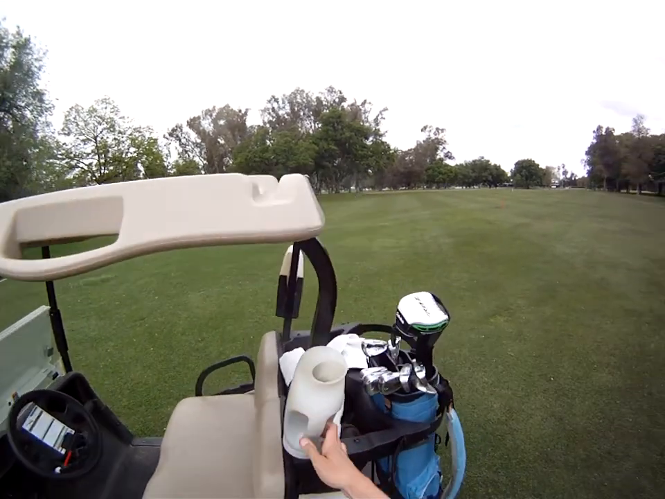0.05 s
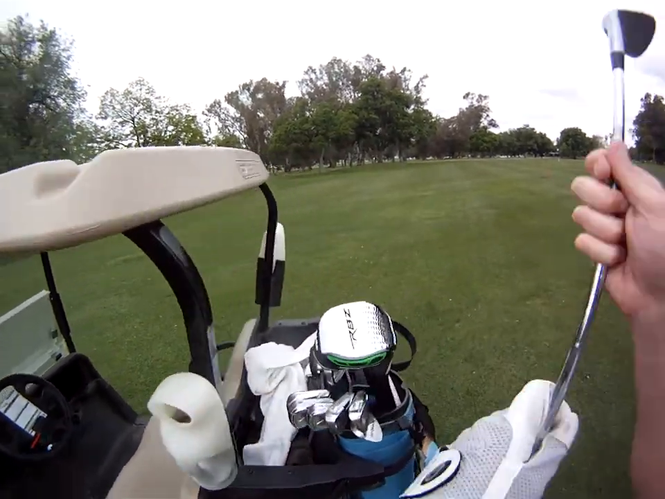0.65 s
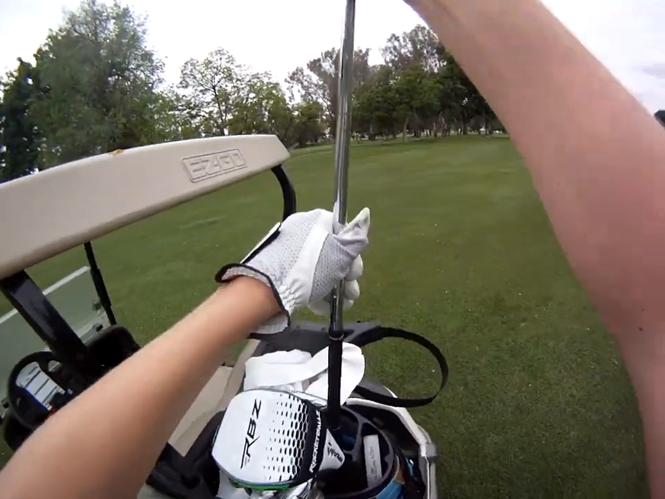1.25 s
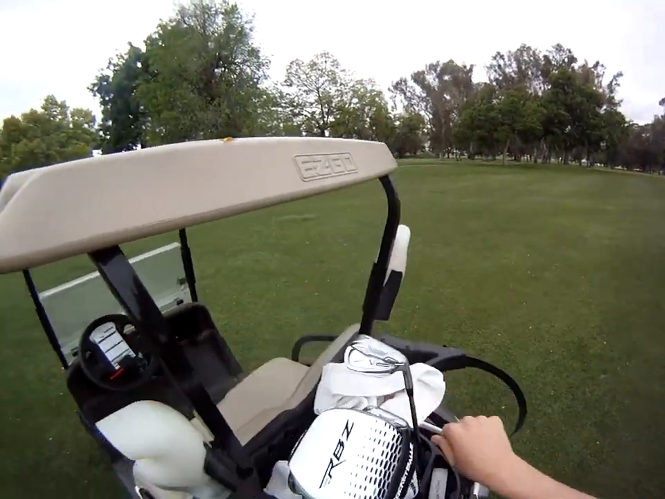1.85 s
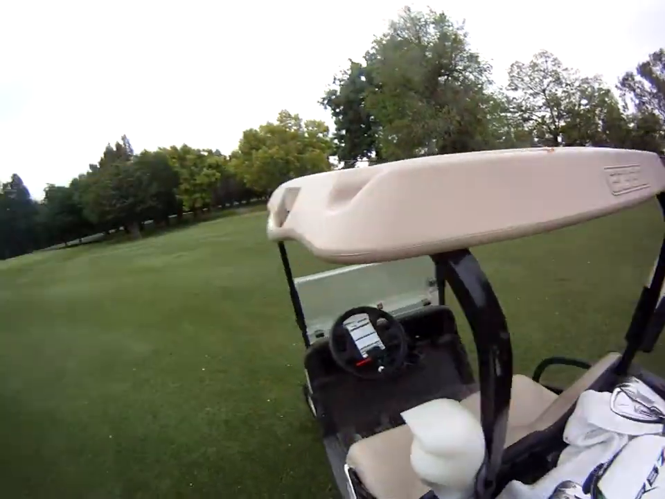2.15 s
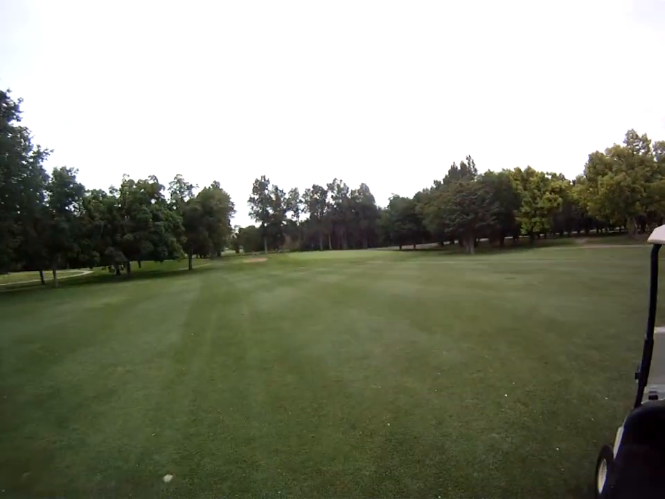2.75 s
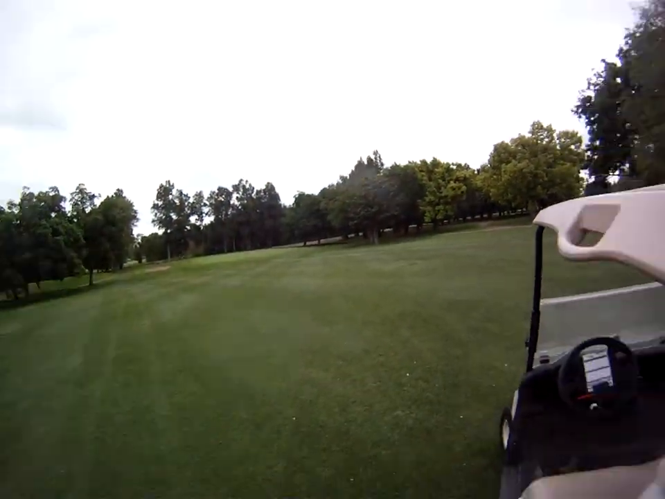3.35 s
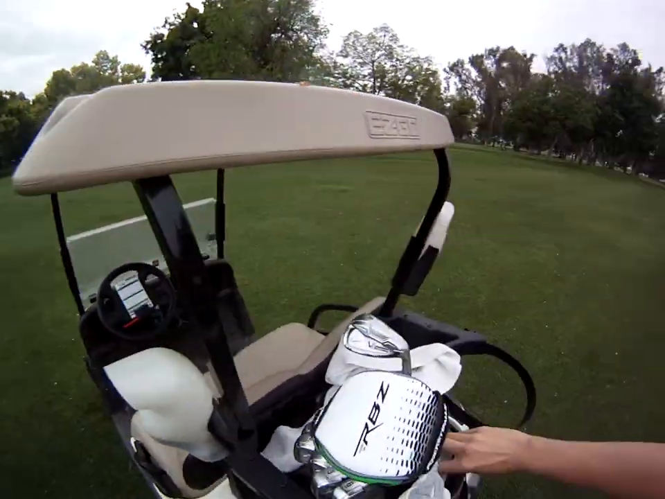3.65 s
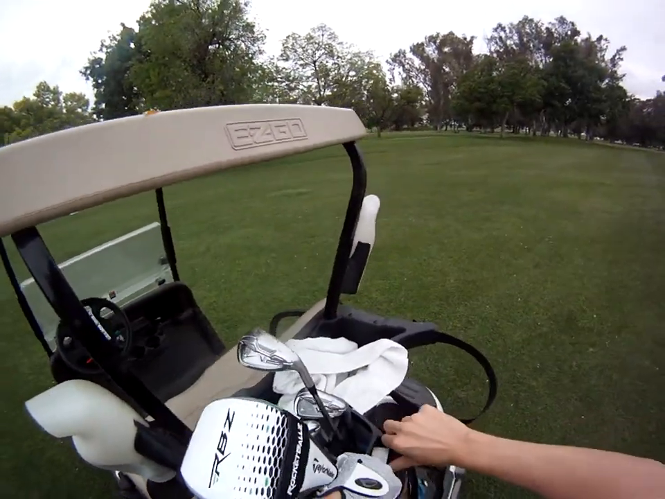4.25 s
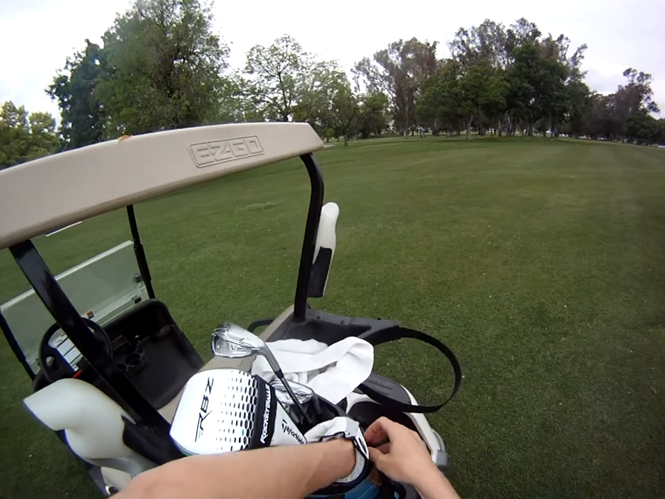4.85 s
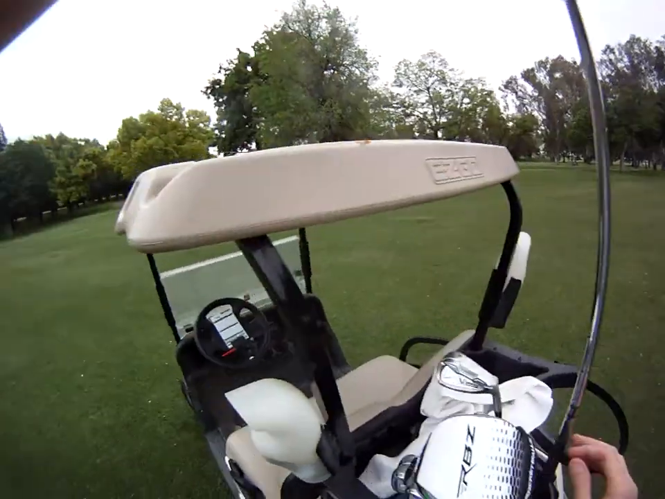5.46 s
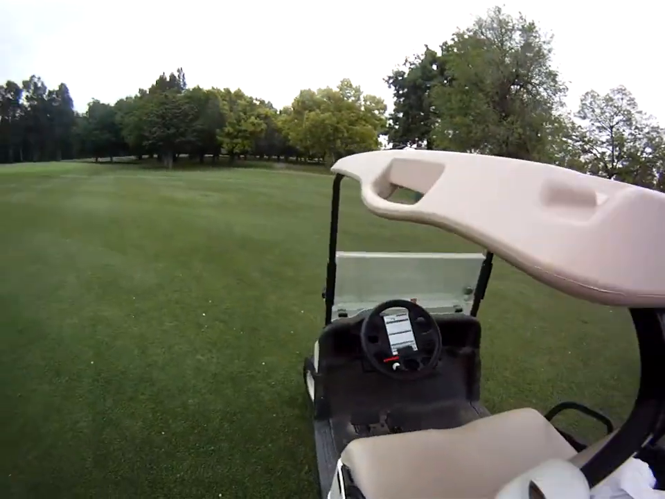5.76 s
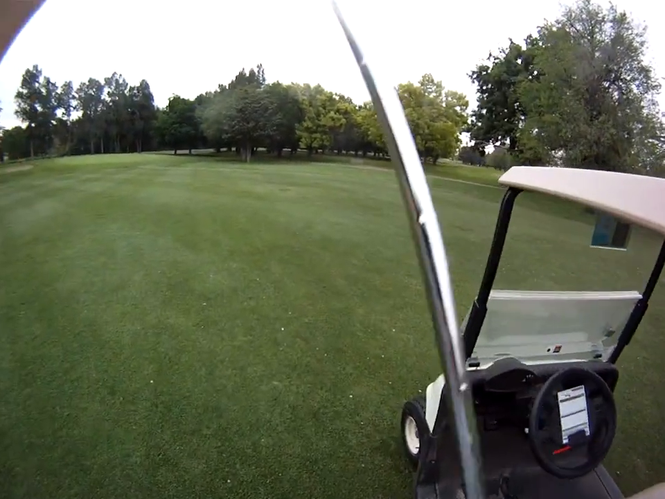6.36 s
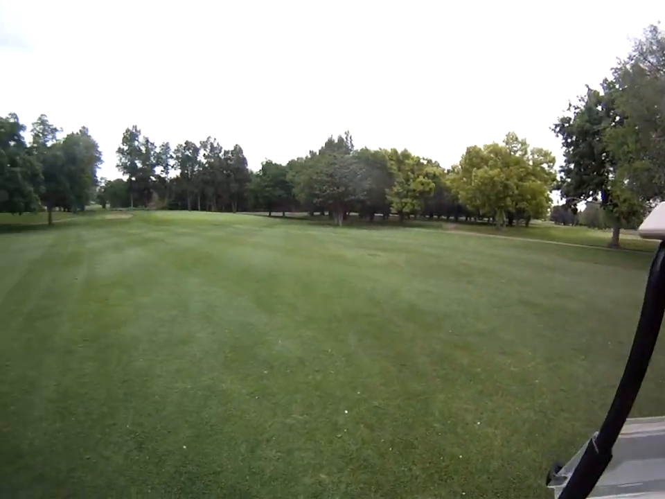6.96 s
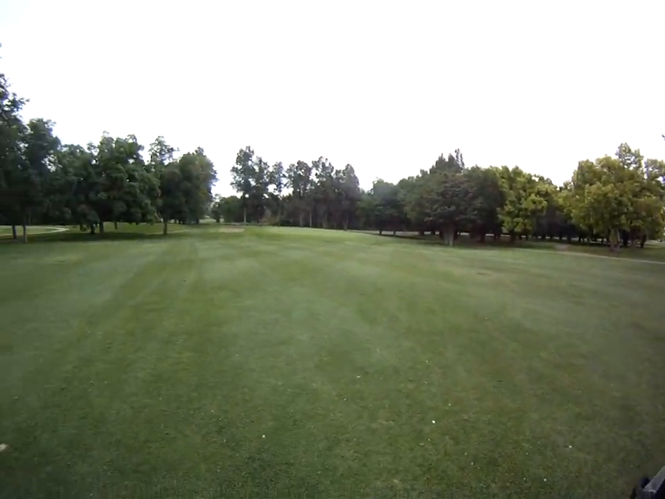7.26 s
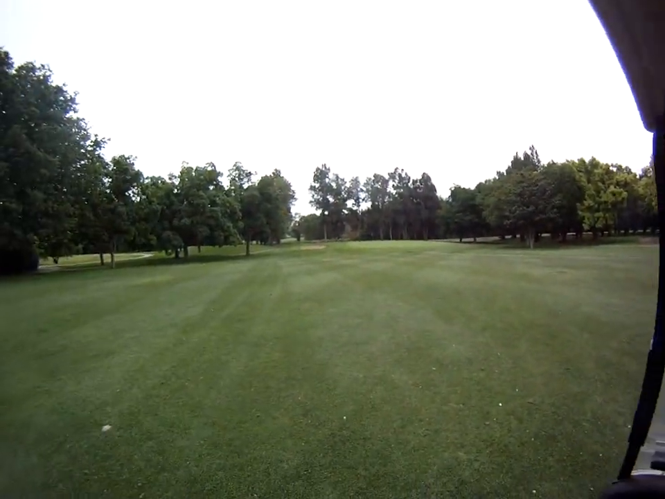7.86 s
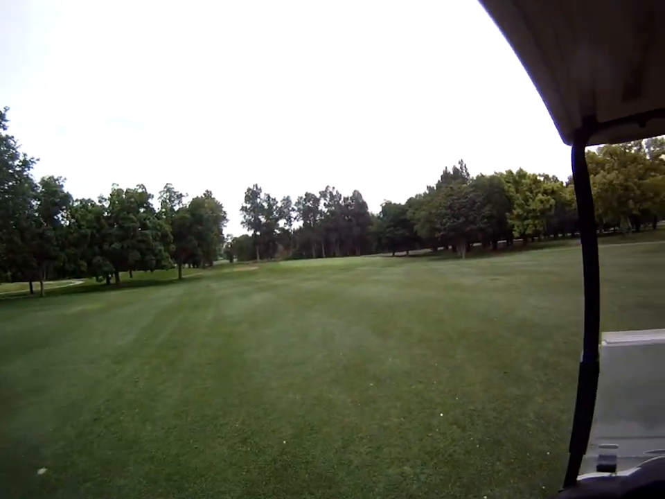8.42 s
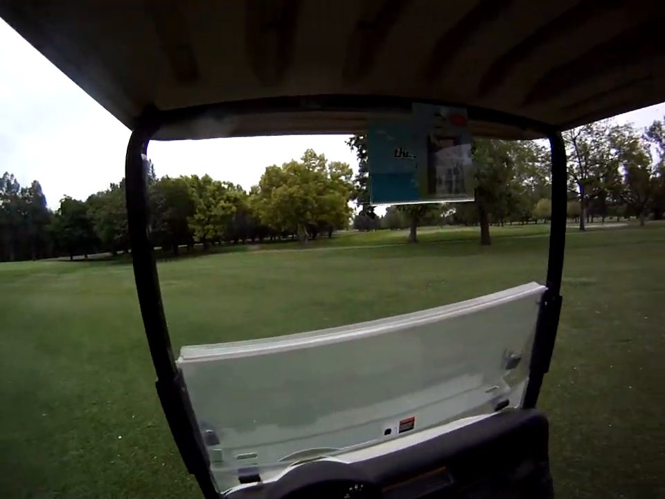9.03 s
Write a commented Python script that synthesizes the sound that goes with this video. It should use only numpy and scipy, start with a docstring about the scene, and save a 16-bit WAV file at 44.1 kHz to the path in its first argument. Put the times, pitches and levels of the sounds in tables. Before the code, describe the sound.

A golf club slides into a bag with hollow knocks and short squeaks, and steel heads clack together. More clattering and scraping follow in bursts as the clubs are rummaged through and one is drawn out. After a lull, someone climbs into a golf cart with low thumps and rattling knocks, ending in a faint hum. Everything is close to the microphone, with light wind and quiet open air behind.

```python
"""Golf fairway, at a cart: a golfer slides an iron into the bag, rummages, draws a club and climbs aboard.
Steel heads clack and ring; shafts knock in the hollow bag, scrape and squeak by stick-slip.
The cart thumps under the golfer's weight, then hums faintly. Behind: light wind and a far bird.
A small head-mounted camera holds each sample at a low rate, mirroring the sound into the treble."""
import sys
import numpy as np
from scipy import signal
from scipy.fft import rfft, irfft, next_fast_len
from scipy.io import wavfile
from scipy.ndimage import uniform_filter1d, map_coordinates

SR = 44100
rng = np.random.default_rng(int(sys.argv[2]) if len(sys.argv) > 2 else 0)


def dump_mix(stems):
    """Bounce the given channels to the path in sys.argv[1] as a 16-bit WAV at rate SR."""
    frames = np.atleast_2d(stems).T  # one column per channel
    limited = np.clip(frames, -1, 1)  # hard clip at full scale
    pcm = np.round(limited * 32767).astype(np.int16)
    wavfile.write(sys.argv[1], SR, pcm)


N = 400869
TIME_S = np.arange(N) / SR
AGE_S = np.arange(SR // 4) / SR  # time since a blow

# Clubs striking the bag. Each row: start in seconds, relative level in dB, hardness (0 grip, 1 shaft).
BAG_KNOCKS = [(0.147, -40, 0.51), (1.473, -36, 0.1), (1.524, -27, 0.017), (1.599, -26, 0.068),
              (1.808, -31.5, 0.033), (1.862, -26, 0.47), (1.911, -25, 0.85), (2.034, -24, 0.66),
              (2.085, -31.5, 0.56), (2.131, -36, 0.81), (2.757, -40.5, 0.83), (2.845, -33, 0.067),
              (3.163, -41, 0.97), (3.52, -33.5, 0.77), (3.58, -25.5, 0.96), (3.607, -25, 0.82),
              (3.637, -27.5, 0.38), (3.656, -20.5, 0.42), (3.887, -32, 0.86), (3.927, -20, 0.78),
              (3.968, -29, 0.83), (3.997, -29.5, 0.68), (4.194, -36.5, 0.89), (5.07, -33.5, 0.28),
              (5.122, -36, 0.88), (5.314, -17, 0.64), (5.363, -21.5, 0.72), (5.48, -24, 0.31),
              (5.788, -30.5, 0.61)]
# Spectrum of bright rubbing. Each row: frequency in Hz, relative level in dB.
SCRATCH_SPECTRUM = [(600, -42), (1200, -8), (1750, 10.5), (2200, 15.5), (3100, 12), (3800, 4), (4300, -20),
                    (5200, -24), (6000, -25)]


def amp(db):
    """Decibels to gain."""
    return 10 ** (np.asarray(db) / 20)


def unit(x):
    """Scale to rms 1."""
    return x / np.sqrt(np.mean(x ** 2) + 1e-20)


def crest(x):
    """Scale the loudest 3 ms to rms 1."""
    return x / np.sqrt(uniform_filter1d(x ** 2, 130).max() + 1e-20)


def fade(t60_s):
    """Exponential decay, 60 dB in t60_s."""
    return np.exp(-np.log(1000) * AGE_S / max(t60_s, 1e-3))


def add(track, start_s, x):
    """Mix x into the track."""
    part = track[max(round(start_s * SR), 0):][:len(x)]
    part += x[:len(part)]


def wobble(rate_hz):
    """Smooth random curve, rate_hz knots a second."""
    return map_coordinates(rng.standard_normal(int(N * rate_hz / SR) + 4), [TIME_S * rate_hz])


def filtered(x, response):
    """Zero-phase filter with gain response(hz)."""
    size = next_fast_len(N + SR // 2)
    return irfft(rfft(x, size) * response(np.fft.rfftfreq(size, 1 / SR)), size)[:N]


def coloured(x, spectrum):
    """Shape x by (Hz, dB) points; rms 1."""
    points_hz, db = np.transpose(spectrum)
    return unit(filtered(x, lambda hz: amp(np.interp(np.log(hz + 1), np.log(points_hz), db))))


def band(x, hz, octaves, order=1):
    """Causal band-pass around hz."""
    edges_hz = hz * 2.0 ** (np.array([-.5, .5]) * octaves)
    return signal.sosfilt(signal.butter(order, edges_hz, "band", fs=SR, output="sos"), x)


def burst(hz, t60_s, octaves, order=1):
    """Decaying band of noise."""
    return crest(band(rng.standard_normal(len(AGE_S)) * fade(t60_s), hz, octaves, order))


def ring(modes, detune, scatter_db):
    """Struck modes; club and contact point shift their pitch and strength on each blow."""
    out = np.zeros(len(AGE_S))
    for hz, db, t60_s in modes:
        strength, shift, polarity = rng.standard_normal(3)
        tone = np.sin(2 * np.pi * hz * (1 + detune * shift) * AGE_S)
        out += np.sign(polarity) * amp(db + scatter_db * strength) * fade(t60_s) * tone
    return crest(out)


def slips(rate_hz):
    """Tiny slips: impulses of random time and size."""
    return (rng.random(N) < rate_hz / SR) * rng.standard_normal(N)


def friction(spectrum, rate_hz, smooth_db):
    """Slips over smooth rubbing noise."""
    return coloured(unit(slips(rate_hz)) + amp(smooth_db) * rng.standard_normal(N), spectrum)


def air():
    """Quiet wash of the fairway, faint crinkle of clothing."""
    # Outdoor spectrum. Each row: frequency in Hz, relative level in dB.
    wash_spectrum = [(90, -4.5), (170, -1.5), (300, -3), (490, 1), (650, -2.5), (900, -11.5), (1500, -15.5),
                     (2100, -19.5), (3100, -15.5), (4000, -23.5), (5000, -20), (6000, -55.5)]
    stir_db = .5 * wobble(rate_hz=3.22) + 2.18 * wobble(rate_hz=45)
    wash = amp(-57 + stir_db) * coloured(rng.standard_normal(N), wash_spectrum)
    crinkle_db = -73.5 + 0.43 * wobble(rate_hz=6.3)
    return wash + amp(crinkle_db) * friction(SCRATCH_SPECTRUM, rate_hz=25, smooth_db=5)


def wind():
    """A light breeze rumbles at the microphone."""
    # Breeze strength. Each row: time in seconds, relative level in dB.
    breeze = [(0, -49.5), (1, -53.5), (2.4, -50.5), (4.5, -52), (7.2, -51.5), (8.1, -44.5), (9.09, -43.5)]
    # Buffeting spectrum. Each row: frequency in Hz, relative level in dB.
    rumble_spectrum = [(15, -5.5), (30, -4.5), (55, 3), (110, -0.5), (170, -7), (260, -14), (500, -41)]
    level_db = np.interp(TIME_S, *np.transpose(breeze)) + 0.5 + 0.96 * wobble(rate_hz=10)
    return amp(level_db) * coloured(rng.standard_normal(N), rumble_spectrum)


def bird():
    """A far bird repeats one short falling note."""
    # Calls. Each row: start in seconds, peak level in dB.
    calls = [(.435, -61), (.625, -61), (1.135, -67), (1.33, -71)]
    progress = np.linspace(0, 1, int(.03 * SR))
    pitch_hz = np.interp(progress, [0, 1], [3400, 2700])
    note = np.sin(np.pi * progress) * np.sin(2 * np.pi * np.cumsum(pitch_hz) / SR)
    out = np.zeros(N)
    for start_s, db in calls:
        add(out, start_s, amp(db) * note)
    return out


def cart_hum():
    """A faint, wavering hum sets in as the golfer settles on the seat."""
    # Hum tones. Each row: frequency in Hz, relative level in dB.
    partials = [(242.2, -58), (425.3, -59), (495.3, -51.5), (624.5, -57.5), (694.4, -57)]
    start_s, rise_s = 8.86, 0.1
    onset = np.clip((TIME_S - start_s) / rise_s, 0, 1)
    warped_s = np.cumsum(1 + 0.016 * wobble(rate_hz=32)) / SR
    return onset * sum(amp(db + 2) * np.sin(2 * np.pi * hz * warped_s) for hz, db in partials)


def glove_scuff():
    """A glove twists on the grip: a brief, bright crackle of slips."""
    peak_s, width_s = 6.885, 0.059
    stroke = np.exp(-np.minimum(np.abs(TIME_S - peak_s) / width_s, 10) ** 2)
    return amp(-61.5) * stroke * unit(band(slips(rate_hz=500), hz=4100, octaves=.4, order=2))


def squeaks():
    """Stick-slip of shafts and grips: the slip rate glides and jitters; jerky motion adds an octave."""
    # Squeaks. Each row: start and length in seconds, first and last pitch in Hz, relative level in dB.
    glides = [(1.534, 0.033, 2500, 2290, -40.5), (1.657, 0.066, 2560, 3040, -37.5),
              (1.825, 0.035, 2900, 2335, -38.5), (4.02, 0.21, 4770, 5000, -64), (4.22, .2, 4500, 3370, -66),
              (5.213, 0.032, 2950, 2860, -44.5), (5.25, 0.056, 3100, 3600, -54),
              (5.315, 0.045, 4150, 4490, -44), (5.385, 0.051, 4470, 4360, -52.5),
              (6.05, .11, 3250, 3320, -59)]
    # Harder pressed is rougher. Each row: squeak level in dB, jitter as a fraction of pitch.
    roughness = [(-46, .028), (-40, .042)]
    out = np.zeros(N)
    jitter = wobble(rate_hz=530)
    for start_s, length_s, first_hz, last_hz, db in glides:
        progress = np.linspace(0, 1, int(length_s * SR))
        glide_hz = first_hz + (last_hz - first_hz) * progress
        deviation = np.interp(db, *np.transpose(roughness)) * jitter[round(start_s * SR):][:len(progress)]
        phase = 2 * np.pi * np.cumsum(glide_hz * (1 + deviation)) / SR
        envelope = np.sqrt(2 * np.abs(np.sin(np.pi * progress)))
        add(out, start_s, amp(db) * envelope * (np.sin(phase) + amp(-20) * np.sin(2 * phase)))
    return out * amp(-7 + 3.5 * wobble(rate_hz=220))


def slides():
    """Shafts, glove and cloth rub: smooth under light pressure, juddering under heavy."""
    # Strokes. Each row: peak time and length in seconds, relative body and scratch levels in dB.
    strokes = [(0.815, 0.1, -55.5, -60), (0.96, 0.35, -49, -66), (1.409, 0.037, -43, -50.5),
               (1.587, .11, -62, -54.5), (1.9, 0.067, -36.5, -40), (2.257, 0.2, -48.5, -64),
               (2.8, 0.5, -54.5, -69), (3.417, 0.34, -47.5, -61), (3.603, 0.057, -29, -43),
               (3.932, 0.076, -36.5, -46), (4.29, 0.039, -43, -56), (5.034, 0.34, -48, -57.5),
               (5.366, 0.13, -48, -53), (5.886, .105, -48.5, -67), (6.888, 0.1, -61, -55.5),
               (7.722, 0.27, -47.5, -61), (8.439, 0.073, -35, -45), (8.695, 0.28, -48.5, -60.5)]
    # Spectrum of dull rubbing. Each row: frequency in Hz, relative level in dB.
    body_spectrum = [(90, -4.5), (170, -1.5), (330, -1.5), (500, 2.5), (680, -4.5), (900, -17), (1300, -13),
                     (1800, -29.5), (3000, -29)]
    rise_share = 0.6
    body_gain, scratch_gain = np.zeros(N), np.zeros(N)
    for peak_s, length_s, body_db, scratch_db in strokes:
        width_s = length_s * np.where(TIME_S < peak_s, rise_share, 1 - rise_share)
        stroke = np.exp(-np.minimum(np.abs(TIME_S - peak_s) / width_s, 10) ** 2)
        body_gain += amp(body_db) * stroke
        scratch_gain += amp(scratch_db) * stroke
    drag = fade(t60_s=0.35)  # a knocked club drags on
    for start_s, db, _ in BAG_KNOCKS:
        add(body_gain, start_s, amp(db - 20.5) * drag)
        add(scratch_gain, start_s, amp(db - 28.5) * drag)
    pressure = scratch_gain / (scratch_gain + amp(-65))
    judder = amp(pressure * (2.27 * wobble(rate_hz=130) - 2.5))
    body = body_gain * friction(body_spectrum, rate_hz=500, smooth_db=-1)
    scratch = scratch_gain * friction(SCRATCH_SPECTRUM, rate_hz=900, smooth_db=-7.5)
    return judder * (body + scratch)


def thump(hz, t60_s, rise_s):
    """Soft contact: a low panel tone swells, then dies in a dull shudder."""
    tone = crest(np.sin(2 * np.pi * hz * AGE_S) * fade(t60_s))
    shudder = burst(hz, t60_s, octaves=1.98, order=2)
    attack = 1 - np.exp(-AGE_S / rise_s)
    return crest((tone + amp(-2.5) * shudder) * attack)


def weight_thumps():
    """Weight lands on bag, floor and seat; each panel has its own pitch."""
    # Heavy bumps. Each row: start in seconds, relative level in dB, pitch in Hz.
    bumps = [(0.002, -22, 192), (0.859, -34.5, 75), (1.554, -29, 140), (1.598, -27, 240.3),
             (5.542, -32.5, 111), (7.575, -29, 109), (7.761, -24.5, 152.4), (7.836, -26.5, 113),
             (7.996, -18.5, 106.3), (8.031, -27, 114), (8.076, -25.5, 118), (8.149, -16, 121),
             (8.162, -24.5, 200.5), (8.189, -31, 182), (8.396, -24, 161.4), (8.418, -17, 167.6),
             (8.443, -22, 175), (8.653, -26.5, 180)]
    t60_cycles = 32
    out = np.zeros(N)
    for start_s, db, hz in bumps:
        add(out, start_s, amp(db - 3.5) * thump(hz, t60_cycles / hz, rise_s=0.0014))
    return out


def knock(hz, rattle_db):
    """A hollow plastic body booms while metal tubes rattle."""
    # Modes of plastic shell and shafts. Each row: frequency in Hz, relative level in dB, t60 in seconds.
    shell_modes = [(301, -0.5, 0.14), (381.2, -10.5, 0.16), (491.8, -0.5, 0.12), (556.7, 4, 0.056),
                   (685, -3.5, 0.1)]
    shaft_modes = [(840, 1, 0.19), (1114, 6, 0.048), (1326, 11.5, 0.069), (1400, -37, .06)]
    shell = ring(shell_modes, detune=0.016, scatter_db=3)
    shell += amp(-7) * burst(hz, t60_s=0.072, octaves=0.74)
    rattle = ring(shaft_modes, detune=0.041, scatter_db=14.5)
    rattle += amp(2) * burst(hz=1260, t60_s=0.044, octaves=1.5, order=2)
    return amp(-5.5) * crest(band(shell, hz, octaves=0.93)) + amp(rattle_db - 1) * crest(rattle)


def cart_knocks():
    """Shoes and clubs hit the cart's hollow panels and shake its loose fittings."""
    # Panel hits. Each row: start in seconds, relative level in dB, band centre in Hz.
    panel_hits = [(7.757, -29.5, 590), (7.831, -32.5, 323), (7.983, -30.5, 293), (8.052, -31, 316),
                  (8.144, -20, 340), (8.511, -24.5, 335), (8.644, -23, 503)]
    out = np.zeros(N)
    for start_s, db, hz in panel_hits:
        add(out, start_s, amp(db) * knock(hz, rattle_db=-12.5))
    return out


def bag_knocks():
    """Clubs hit the bag: bare shafts sound higher and rattle, rubber grips make it sag."""
    rebound_s, rebound_db = .012, -8.5  # off the far side of the divider
    out = np.zeros(N)
    for start_s, db, hardness in BAG_KNOCKS:
        hz = np.interp(hardness, [0, 1], [260, 590])
        rattle_db = np.interp(hardness, [0, 1], [-44, -2.5])
        sag_db = np.interp(hardness, [0, 1], [-6.5, -20])
        add(out, start_s, amp(db) * knock(hz, rattle_db))
        add(out, start_s + rebound_s, amp(db + rebound_db) * knock(hz, rattle_db))
        add(out, start_s, amp(db + sag_db) * thump(hz=117.4, t60_s=.2, rise_s=0.0036))
    return out


def clack(hz):
    """Steel on steel: a sharp crack and a damped ring."""
    # Modes of heads and shafts. Each row: frequency in Hz, relative level in dB, t60 in seconds.
    steel_modes = [(2040, -19.5, 0.23), (2214, -3, 0.06), (2710, -10, 0.1), (3026, 11, 0.034),
                   (3550, -18, 0.17), (3570, 2, 0.043), (3580, 2.5, 0.033)]
    contact = burst(hz, t60_s=0.017, octaves=0.26, order=2)
    shiver = burst(hz, t60_s=0.044, octaves=0.49, order=2)
    steel = crest(band(ring(steel_modes, detune=0.0095, scatter_db=4), hz, octaves=0.35))
    snap = burst(hz=3200, t60_s=0.0096, octaves=0.6)
    return crest(contact + amp(-2) * steel + amp(-7.5) * shiver + amp(-1) * snap)


def head_clacks():
    """Club heads meet, rebound once and leave their neighbours ticking at random."""
    # Hits of heads and small hard parts. Each row: start in seconds, relative level in dB, centre in Hz.
    hits = [(0.1473, -41.5, 3130), (1.8602, -31, 2300), (1.909, -24.5, 2280), (2.0302, -17.5, 2200),
            (2.0528, -25, 2590), (2.0792, -30, 2850), (2.1266, -33, 2950), (2.171, -31, 2700),
            (2.2226, -37, 2350), (2.2943, -43, 2430), (2.365, -41, 2400), (2.8227, -42.5, 3020),
            (2.9843, -33.5, 2750), (3.1773, -44, 2900), (3.359, -33, 2650), (3.4039, -25.5, 2780),
            (3.457, -42, 4120), (3.496, -29.5, 3200), (3.5214, -23, 2670), (3.5682, -27.5, 3530),
            (3.5788, -25, 3030), (3.5918, -21.5, 3770), (3.6092, -21, 2260), (3.645, -29, 2190),
            (3.6521, -21.5, 2520), (3.6842, -29.5, 2800), (3.7898, -38.5, 2130), (3.8985, -21.5, 2060),
            (3.966, -27.5, 2560), (4.0177, -41, 2200), (4.0532, -40.5, 2180), (4.2882, -35, 2190),
            (4.947, -35, 2610), (5.1474, -41, 2180), (5.3127, -29, 1830), (5.3618, -24, 2860),
            (5.3843, -35, 2900), (5.6301, -40.5, 2900), (5.7862, -40.5, 2230), (5.8455, -40.5, 3700),
            (5.9043, -41, 2700), (6.5626, -42.5, 2050), (7.832, -39, 2850), (7.881, -40.5, 4300),
            (8.0544, -35, 3420), (8.1462, -24.5, 2200), (8.5155, -34.5, 2900), (8.6403, -24.5, 2970),
            (8.6472, -24, 2460)]
    rebound_s, rebound_db = .006, -9.5
    settle_s, settle_db = .35, -22.5
    tick_delays_s = settle_s * rng.random(size=(len(hits), 2))
    out = np.zeros(N)
    for (start_s, db, hz), delays_s in zip(hits, tick_delays_s):
        add(out, start_s, amp(db) * clack(hz))
        add(out, start_s + rebound_s, amp(db + rebound_db) * clack(hz))
        for delay_s in delays_s:
            add(out, start_s + delay_s, amp(db + settle_db) * clack(hz))
    return amp(-7.5) * out


def scene():
    """Clubs and cart close by, the fairway behind; mono."""
    impacts = head_clacks() + bag_knocks() + cart_knocks() + weight_thumps()
    rubbing = slides() + glove_scuff() + squeaks()
    return (impacts + rubbing + cart_hum() + bird() + air() + wind())[None]


def record(dry):
    """Sample-and-hold mirrors the band-limited sound around the hold rate; the microphone adds hiss."""
    hold_hz, taper_hz, top_hz = 12000, 650, 15400
    base = filtered(dry[0], lambda hz: np.clip((hold_hz / 2 - hz) / taper_hz, 0, 1))
    sidebands = base * 2 * np.cos(2 * np.pi * hold_hz * TIME_S)
    mirror = filtered(sidebands, lambda hz: np.abs(hz - hold_hz) / np.maximum(hz, hold_hz / 2))
    hiss = amp(-80.5) * rng.standard_normal(N)
    return filtered(base + amp(.4) * mirror + hiss, lambda hz: hz < top_hz)[None]


dry = scene()
out = record(dry)
dump_mix(out)
```